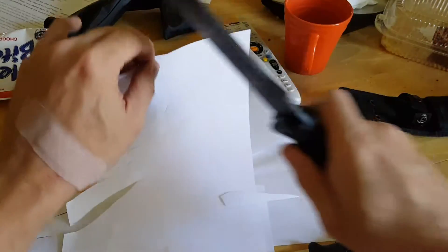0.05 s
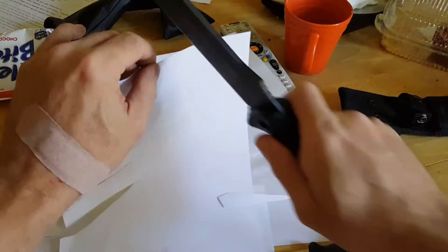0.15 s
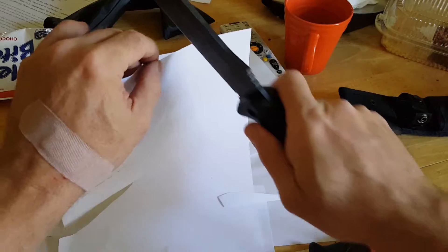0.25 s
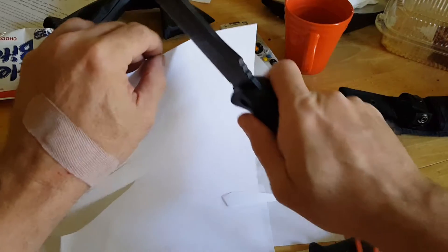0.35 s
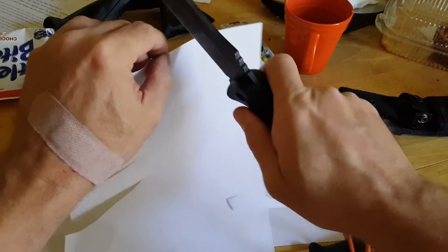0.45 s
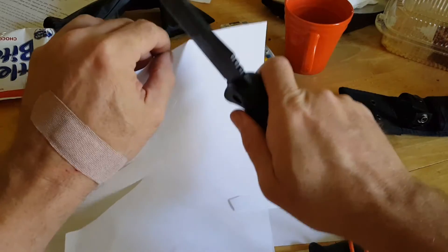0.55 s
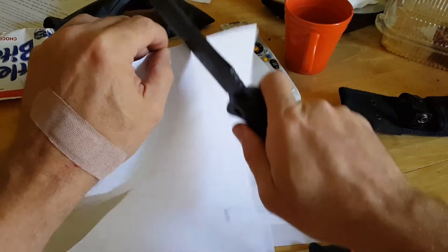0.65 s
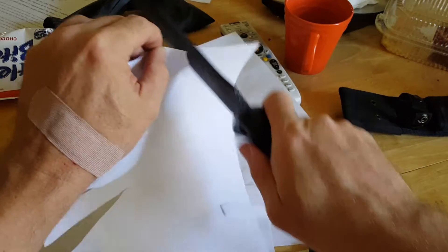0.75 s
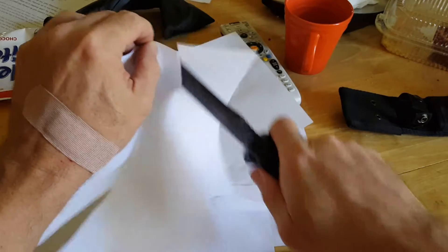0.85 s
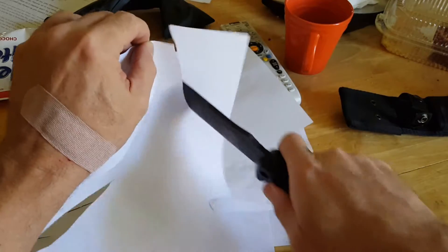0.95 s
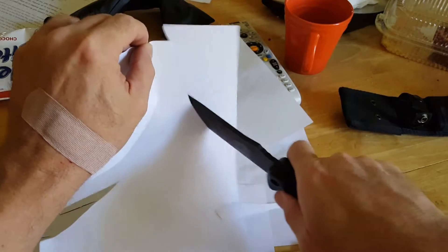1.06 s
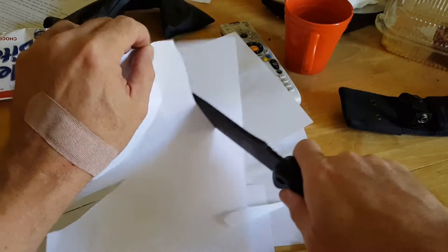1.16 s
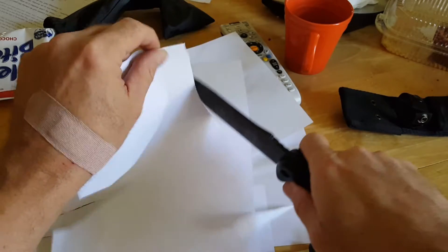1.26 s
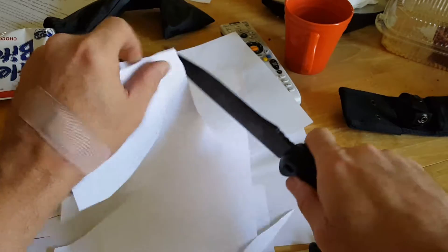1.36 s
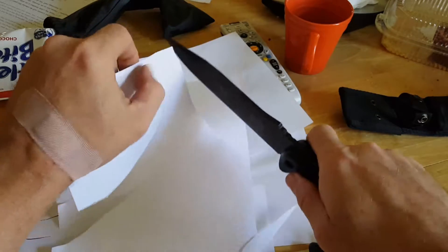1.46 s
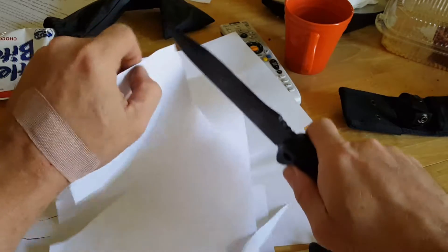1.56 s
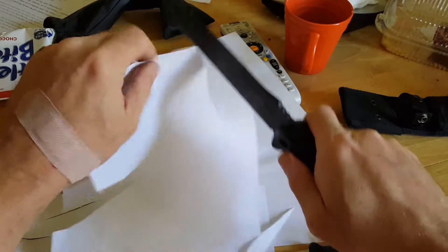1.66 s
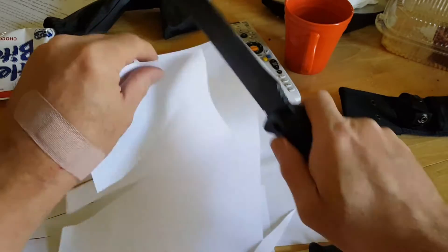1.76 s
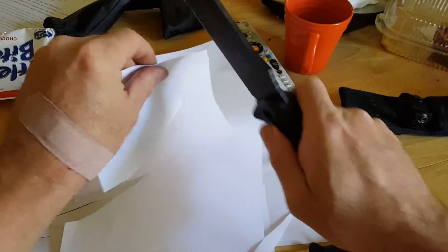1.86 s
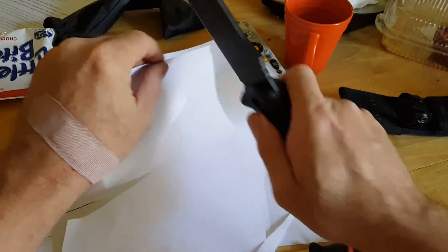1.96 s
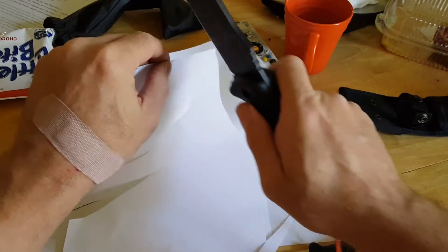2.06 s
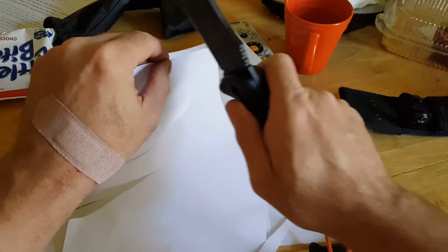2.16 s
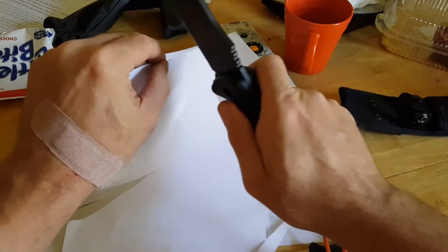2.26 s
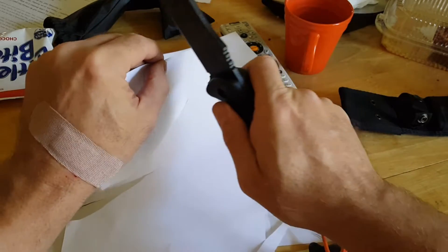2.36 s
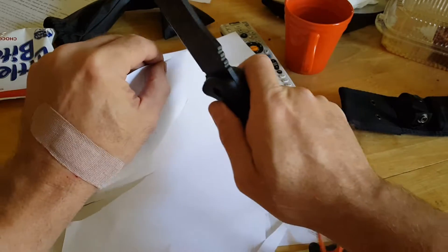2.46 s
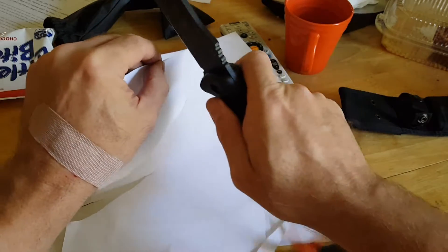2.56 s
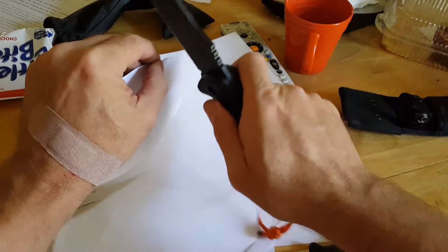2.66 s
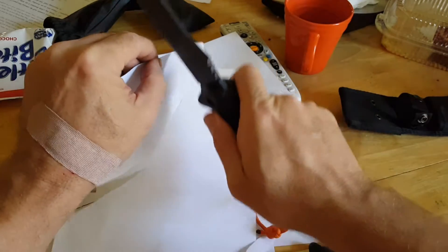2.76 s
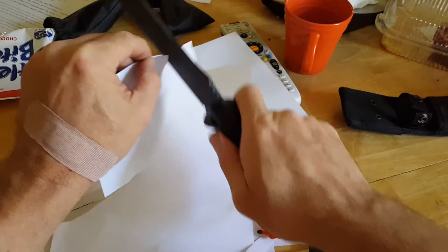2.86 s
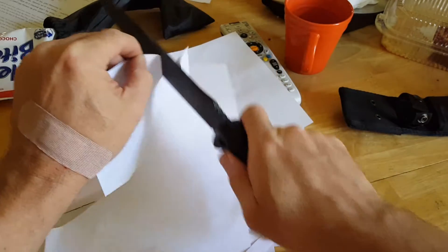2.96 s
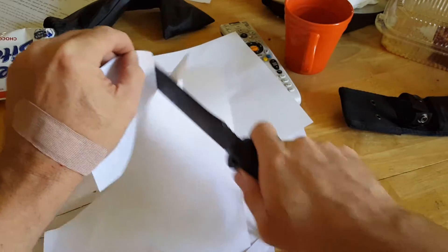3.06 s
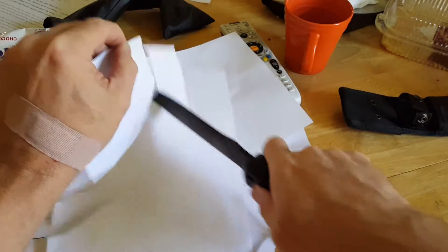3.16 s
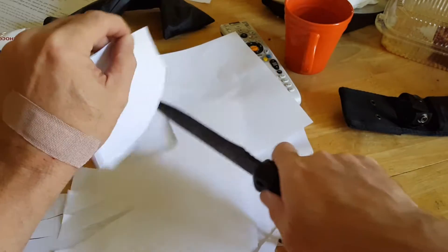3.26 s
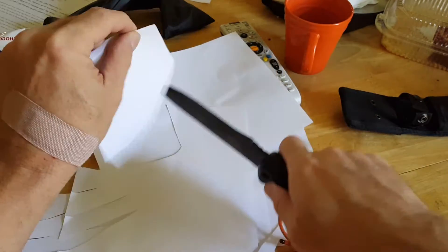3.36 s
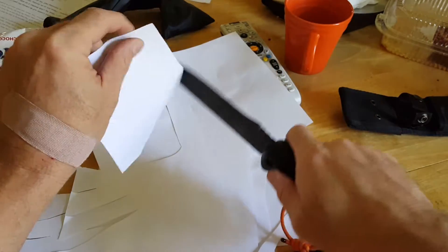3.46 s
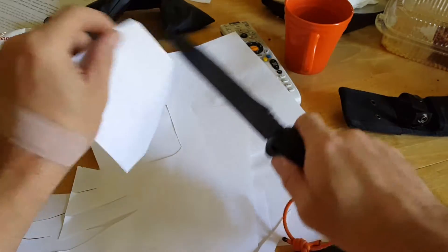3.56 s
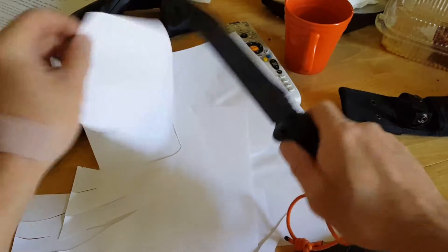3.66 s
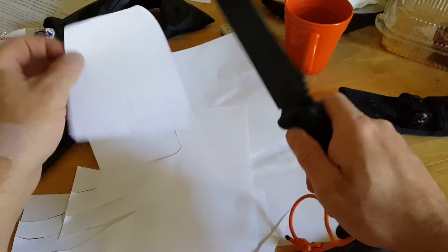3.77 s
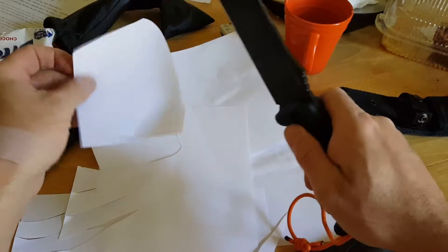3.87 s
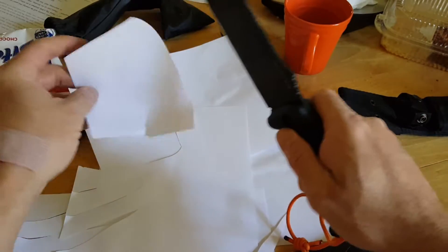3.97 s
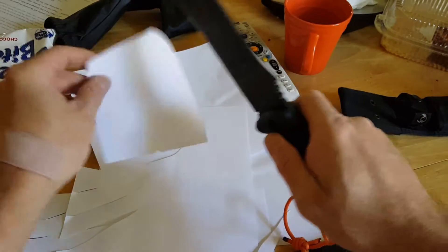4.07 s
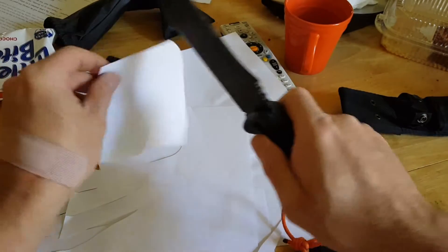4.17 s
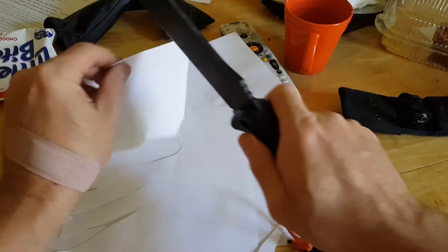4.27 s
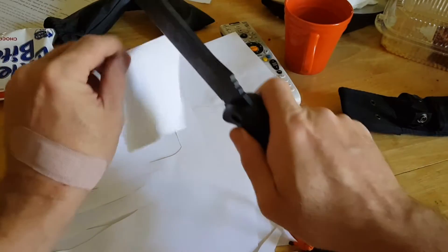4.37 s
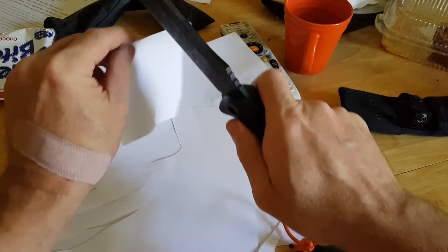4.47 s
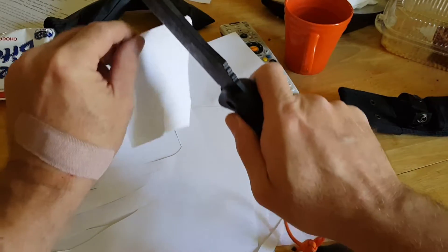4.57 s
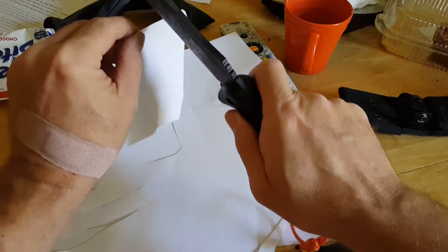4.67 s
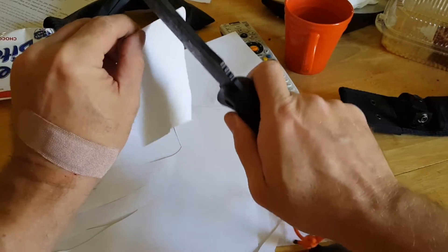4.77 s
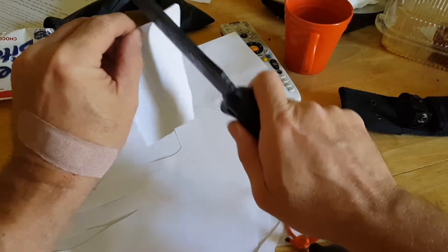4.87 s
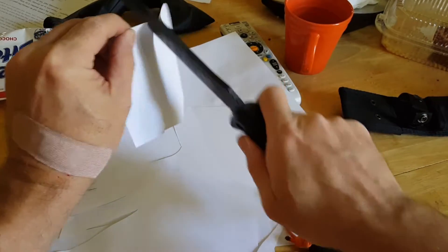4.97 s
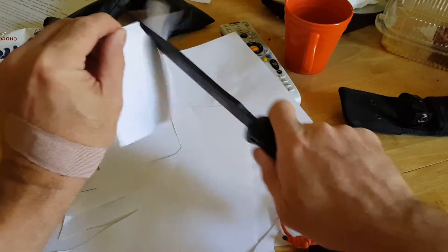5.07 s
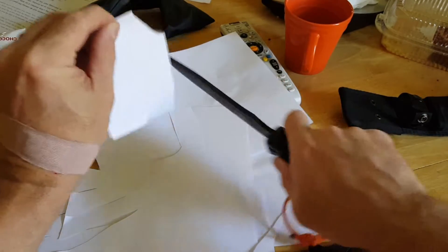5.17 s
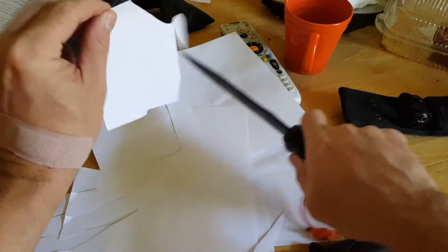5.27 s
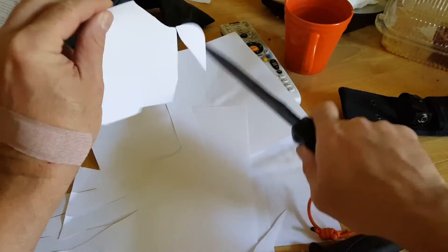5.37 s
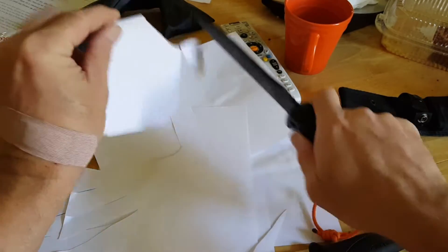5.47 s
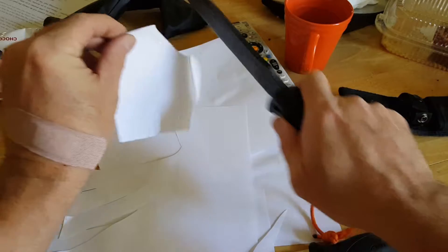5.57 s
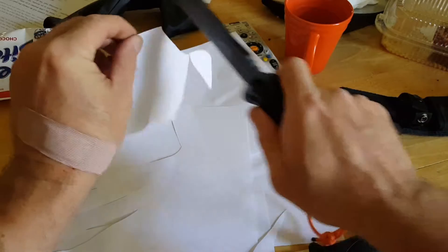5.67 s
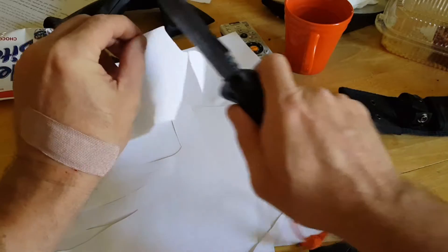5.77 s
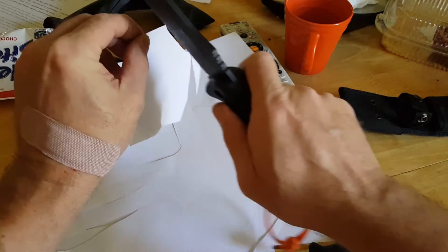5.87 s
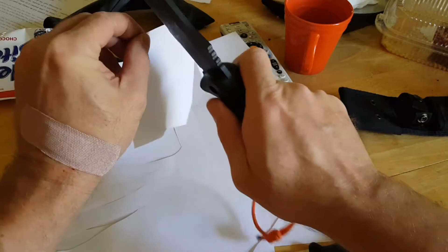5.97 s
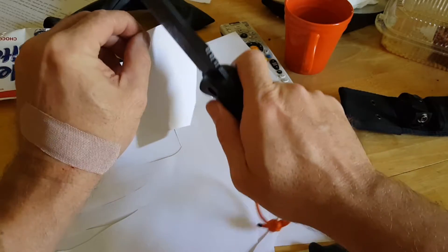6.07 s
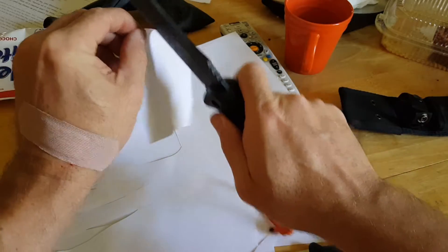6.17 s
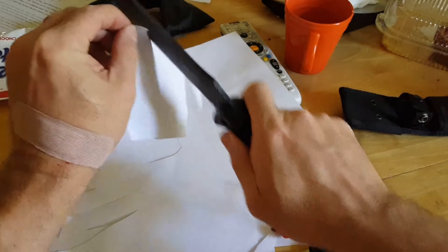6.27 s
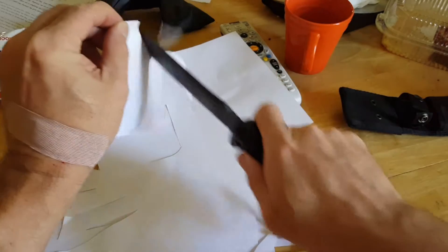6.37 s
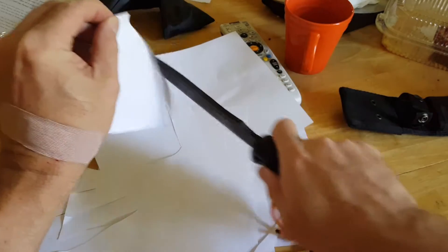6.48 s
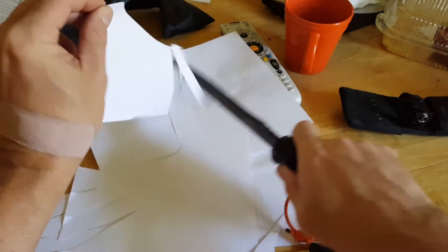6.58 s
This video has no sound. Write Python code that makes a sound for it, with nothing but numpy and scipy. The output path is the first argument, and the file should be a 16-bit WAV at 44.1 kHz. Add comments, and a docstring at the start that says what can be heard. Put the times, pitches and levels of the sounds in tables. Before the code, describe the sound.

Close stereo pickup of a knife cutting held paper in a small quiet room. A half-second slice swells to a sharp crack, then paper rustles and flicks. A second cut comes in two pulls, followed by handling crackles, then two short crisp slices with a quiet gap between them. Faint room air and mains hum lie beneath.

```python
"""Paper sliced above a wooden table

A sharp knife slices a hand-held sheet four times, close to a stereo microphone in a small quiet room.
Each cut is a dense run of snapping fibres that hisses at the edge and shakes the sheet and its loose flap.
Between cuts the paper slides as uneven friction noise, and flicks and drops on the pile as plucked
resonances, over still room air and a faint mains hum of wavering sines."""
import sys
import numpy as np
from scipy import signal
from scipy.fft import rfft, irfft, next_fast_len
from scipy.io import wavfile
from scipy.ndimage import uniform_filter1d, map_coordinates

SR = 44100
rng = np.random.default_rng(int(sys.argv[2]) if len(sys.argv) > 2 else 0)


def log_audio(samples):
    """Write samples as a 16-bit WAV file to the path given in sys.argv[1]."""
    # one column per channel
    frames = np.atleast_2d(samples).T
    # limit to full scale, then quantise
    limited = np.clip(frames, -1, 1)
    pcm = np.round(limited * 32767).astype(np.int16)
    wavfile.write(sys.argv[1], SR, pcm)


N = 291693
TIME = np.arange(N) / SR


def amp(db):
    """Decibels to gain."""
    return 10 ** (np.asarray(db) / 20)


def unit(x):
    """Scale to rms 1."""
    return x / np.sqrt(np.mean(x ** 2) + 1e-20)


def along(points, hz):
    """Read (frequency [Hz], value) points on a log frequency axis."""
    f, v = np.transpose(points)
    return np.interp(np.log(hz + 1), np.log(f + 1), v)


def filtered(x, response):
    """x times a complex response of frequency."""
    size = x.shape[-1]
    padded = next_fast_len(size + 4096)
    spectrum = rfft(x, padded) * response(np.fft.rfftfreq(padded, 1 / SR))
    return irfft(spectrum, padded)[..., :size]


def coloured(x, spectrum):
    """x shaped by the given spectrum, at rms 1."""
    return unit(filtered(x, lambda hz: amp(along(spectrum, hz))))


def resonance(f, hz, width, db):
    """Complex response of one damped mode, which peaks at hz."""
    return amp(db) * 1j * f * width / (hz * hz - f * f + 1j * f * width)


def rung(x, modes):
    """x through a bank of resonances of alternating sign, at rms 1."""
    def bank(f):
        return sum((-1) ** k * resonance(f, *mode) for k, mode in enumerate(modes))
    return unit(filtered(x, bank))


def wobble(rate, size):
    """A smooth random curve, rate knots a second."""
    knots = rng.standard_normal(int(size * rate / SR) + 4)
    return map_coordinates(knots, [np.arange(size) * rate / SR])


# how alike the two microphone ports hear a source: (frequency [Hz], left-right likeness [0 to 1])
LIKENESS = [(130, 0.91), (350, 0.93), (750, 0.71), (1400, 0.75), (3000, 0.18), (6000, 0.26), (14000, 0.12)]
# how far the source leans to the left port: (frequency [Hz], left minus right [dB])
LEFT_LEAN = [(380, 1), (700, 2), (1300, 2.5), (2400, 2), (4400, -1), (6500, 4.5), (9500, -0.5),
             (15000, 0.5)]


def at_ports(pair, lead_ms=0.12):
    """Two unrelated signals become left and right: a broad source that reaches the left port first."""
    def mid_and_side(hz):
        turn = np.arccos(np.clip(along(LIKENESS, hz), -1, 1)) / 2
        return np.array([np.cos(turn), np.sin(turn)])

    half = np.array([[.5], [-.5]])  # each port takes half of the level and time difference
    lead_s = lead_ms / 1000

    def lean_left(hz):
        return amp(half * along(LEFT_LEAN, hz)) * np.exp(2j * np.pi * hz * lead_s * half)

    mid, side = filtered(pair, mid_and_side)
    return filtered(np.array([mid + side, mid - side]), lean_left)


def snaps(size, per_second, clump_db, clump_rate):
    """Fibres let go at random moments, in clumps where the paper is thicker."""
    clicks = (rng.random((2, size)) < per_second / SR) * rng.standard_normal((2, size))
    clumps = amp(clump_db * wobble(clump_rate, size))
    return unit(at_ports(clicks * clumps))


# still air of the room: (frequency [Hz], relative level [dB per Hz])
AIR = [(30, -13), (60, -15), (85, -4), (150, -4.5), (185, 2), (230, -2.5), (280, -12), (450, -6),
       (650, -12.5), (2000, -17.5), (5000, -25.5), (7500, -32), (10000, -36.5), (16000, -29)]
# steady partials of the mains hum, before they waver: (frequency [Hz], level [dB])
HUM_PARTIALS = [(59.5, -78.5), (119, -68.5), (231.5, -71.5), (334, -76.5)]


def background(air_db=-62.5):
    """Shaped noise for still room air, and sines of wavering level and phase for a faint mains hum."""
    air = coloured(at_ports(rng.standard_normal((2, N))), AIR)
    hum = np.zeros(N)
    for hz, db in HUM_PARTIALS:
        level = amp(db + 2.5 * wobble(9, N))
        phase = 2 * np.pi * hz * TIME + .8 * wobble(7, N)
        hum += level * np.sqrt(2) * np.sin(phase)  # root 2 makes the level an rms
    return amp(air_db) * air + hum


# paper brushing over paper, blade and skin:
# (start [s], length [s], hiss level [dB], stirred sheet over the hiss [dB])
BRUSH_STROKES = [(-0.08, 0.2, -59.5, 0), (0.128, 0.2, -62, 1), (0.382, 0.27, -64, -1.5),
                 (1.13, 0.15, -57.5, 6.5), (1.255, 0.2, -48.5, -4), (1.381, 0.21, -55, 1),
                 (1.54, 0.27, -56.5, -2), (1.741, 0.25, -54.5, -1.5), (1.951, 0.23, -57.5, 1),
                 (2.702, .13, -56, -1), (3.16, 0.14, -41, -5), (3.267, 0.37, -61.5, -5),
                 (3.546, 0.4, -59.5, -4), (3.873, 0.19, -55.5, -5.5), (3.998, 0.051, -44.5, -1),
                 (4.002, 0.23, -54, -2), (4.231, 0.11, -61.5, -17), (4.413, .11, -62.5, -25),
                 (4.55, .15, -60, -3.5), (5.29, 0.44, -63, -24), (6.251, .14, -35, -33)]
BRUSH_PEAK_SHARE, BRUSH_ROUNDNESS = 0.32, 1.28  # where along its length a brush peaks; power of its curve
SETTLE_DB, SETTLE_T60_S = -28, 0.16  # rustle of a sheet settling after a flick


def brushing():
    """Gains of hiss and stirred sheet: each brush speeds up and slows to a stop; each flick settles."""
    hiss, sheet = np.zeros((2, N))
    for start, length, db, stir_db in BRUSH_STROKES:
        stroke = np.interp((TIME - start) / length, [0, BRUSH_PEAK_SHARE, 1], [0, 1, 0])
        speed = np.sin(np.pi / 2 * stroke) ** BRUSH_ROUNDNESS
        hiss += amp(db) * speed
        sheet += amp(db + stir_db) * speed
    t = np.arange(SR // 2) / SR
    settling = np.exp(-np.log(1000) * t / SETTLE_T60_S)
    for start, db, _, crackle_db in PAPER_FLICKS:
        hiss[round(start * SR):][:len(t)] += amp(db + crackle_db + SETTLE_DB) * settling
    return hiss, sheet


# hiss of sliding fibres: (frequency [Hz], relative level [dB per Hz])
SLIDE_HISS = [(700, -28.5), (1500, -3), (2300, -6.5), (4000, 0.5), (7700, -7), (9500, -17), (16000, -12)]
# the sheet they stir: (frequency [Hz], relative level [dB per Hz])
STIRRED_SHEET = [(100, -12), (200, -1.5), (450, -6.5), (620, -3.5), (800, -5.5), (1100, -6.5), (1600, -6.5),
                 (2800, -6), (6000, -66)]


def sliding(hiss, sheet, uneven_db=0.5):
    """Paper drags unevenly over paper, with a few tiny crinkles, while the hands find the next cut."""
    friction = snaps(N, per_second=12000, clump_db=1.3, clump_rate=90)
    friction += .4 * snaps(N, per_second=70, clump_db=1, clump_rate=20)  # crinkles
    drag = amp(uneven_db * wobble(20, N))
    return drag * (hiss * coloured(friction, SLIDE_HISS) + sheet * coloured(friction, STIRRED_SHEET))


# light catches: mean rate; level over the slide and its random spread either way, in dB
TICKS_PER_S, TICK_DB, TICK_SPREAD_DB = 5.8, 7.5, 4.5


def ticks(slide, thud_db=-9, crackle_db=-4):
    """Sliding paper catches lightly at random, harder where it slides louder; rows like PAPER_FLICKS."""
    rows = []
    for when, size in rng.random((int(TICKS_PER_S * N / SR), 2)):
        slide_db = 20 * np.log10(slide[int(when * N)] + 1e-9)
        db = slide_db + TICK_DB + TICK_SPREAD_DB * (2 * size - 1)
        rows.append((when * N / SR, db, thud_db, crackle_db))
    return rows


# bending modes of a loose flap: (multiple of its pitch, width [Hz], relative level [dB])
FLAP_BENDING = [(1, 117, -1.5), (2, 82, 4.5)]


def flap_modes(pitch_hz):
    """Bending modes of a flap of the given pitch, as (frequency [Hz], width [Hz], level [dB])."""
    return [(pitch_hz * multiple, width, db) for multiple, width, db in FLAP_BENDING]


# flicks, catches and landings of paper; the trims add to the balance set in flicks():
# (time [s], overall level [dB], thud trim [dB], crackle trim [dB])
PAPER_FLICKS = [(0.087, -52.5, -22, 4.5), (0.166, -37.5, -8, 6), (0.18, -39, -3, 1), (0.674, -45, 9.5, -15),
                (0.921, -18, -33, -9), (0.938, -12.5, -24, -6), (1.092, -18, -22, -21),
                (1.302, -21, -10.5, -4.5), (1.433, -39, -23, -4), (1.569, -38, -7.5, 5.5),
                (1.666, -35.5, -3.5, -8.5), (1.758, -44.5, -3, 0.5), (2.392, -46, -7, -15.5),
                (2.868, -26.5, -7.5, -13), (3.266, -35.5, -4, -1), (3.45, -47.5, -4, -3),
                (3.493, -44, -2, -4), (3.976, -28.5, -20, 3.5), (4.002, -27.5, -9, 6.5),
                (4.009, -26, -35, 6), (4.109, -35, -15, -14), (4.15, -42, -8, -15), (4.274, -48, -7, -13),
                (5.356, -45, -0.5, -18), (5.539, -51, 0, -3)]
# resonances of a plucked sheet: (frequency [Hz], width [Hz], relative level [dB])
PLUCKED_SHEET = [(798, 177, -6.5), (1117, 200, -1.5), (1403, 610, -12.5)]
# a buckling crease: (frequency [Hz], relative level [dB per Hz])
CREASE_CRACKLE = [(600, -39), (1300, -17), (1800, 5.5), (3000, 3), (4300, 2.5), (5500, -1), (7700, -11.5),
                  (9500, -21.5), (16000, -33)]
FLICK_T60_S = 0.063  # a plucked sheet dies away


def flicks(rows, pluck_db=-6, thud_db=-7, crackle_db=-6, thud_hz=210):
    """A sheet buckles or lands: a crack and a short crackle pluck the paper, with a soft thud."""
    out = np.zeros((2, N + SR))
    t = np.arange(SR // 4) / SR
    crack = 1.6 * amp(-60 * t / .009)  # the crease flips within a few milliseconds
    attack = 1 - np.exp(-t / .0003)
    fade = amp(-60 * t / FLICK_T60_S)
    for start, db, thud_trim, crackle_trim in rows:
        crease = snaps(len(t), per_second=14000, clump_db=.5, clump_rate=500)
        pluck = amp(pluck_db) * rung(crease, PLUCKED_SHEET)
        crackle = amp(crackle_trim + crackle_db) * coloured(crease, CREASE_CRACKLE)
        thud = amp(thud_trim + thud_db) * rung(crease, flap_modes(thud_hz))
        # the slow bending modes last twice as long
        sound = (crack + fade) * (pluck + crackle) + np.sqrt(fade) * thud
        out[:, round(start * SR):][:, :len(t)] += amp(db) * attack * sound
    return out[:, :N]


def flexing(x, depth_db=2.8):
    """The sheet bends as it parts, so its many resonances come and go."""
    z = signal.stft(x, nperseg=512)[2]
    field = rng.standard_normal(z.shape[1:])
    field = uniform_filter1d(field, size=2, axis=0)  # over frequency
    field = uniform_filter1d(field, size=16, axis=1)  # over time
    return signal.istft(z * amp(depth_db * unit(field)), nperseg=512)[1][:, :x.shape[-1]]


# one row per pull of the blade, the second cut in two pulls; levels before the balance in slicing():
# (blade bites [s], blade leaves [s], release time constant [s], sheet over rim [dB],
#  its growth as the paper slackens [dB], hiss [dB], flap [dB], flap pitch [Hz])
PULLS = [(0.673, 1.166, 0.0031, -1, -9, -10.5, -14.5, 241), (2.867, 3.059, 0.023, -7, -6.5, -6, -19, 220),
         (3.058, 3.188, 0.0036, -4, -1.5, -2.5, -23, 252), (4.911, 5.179, 0.022, -9, 12, -6.5, -17, 214),
         (6.21, 6.521, 0.031, -2.5, 4, -3.5, -14, 320)]
# how hard the blade works, one curve per pull: (time [s], effort [dB])
BLADE_EFFORT = [
    [(0.68, -36.5), (0.73, -30), (0.802, -34), (0.81, -30), (0.916, -29.5), (0.922, -26.5), (1.078, -26.5),
     (1.09, -24.5), (1.16, -31)],
    [(2.88, -36), (2.944, -35), (3.04, -34.5), (3.06, -31.5)],
    [(3.04, -29), (3.084, -30), (3.164, -26.5), (3.185, -34.5)],
    [(4.92, -36), (4.986, -32), (5.06, -32), (5.126, -36), (5.185, -33.5)],
    [(6.22, -46), (6.246, -39), (6.27, -48), (6.37, -43), (6.45, -30.5), (6.512, -32), (6.53, -34)],
]
# the sheet as it is held for each pull: (frequency [Hz], relative level [dB per Hz])
HELD_1 = [(320, -58), (550, -9.5), (650, -13.5), (704, -6), (983, 1), (1330, -3.5), (1530, -11),
          (1700, -4.5), (2000, -5.5), (2470, -10.5), (3810, -13), (4500, -25), (5850, -51), (9900, -120)]
HELD_2 = [(320, -62), (550, -8.5), (644, -17), (722, -4), (1070, 0), (1290, -4), (2520, -1.5), (3190, -3),
          (3610, 1.5), (4500, -16), (5850, -34), (9900, -120)]
HELD_3 = [(320, -70.5), (550, -16.5), (633, -25), (861, -6.5), (1060, -4), (1200, -5), (1500, -10.5),
          (1880, -1.5), (2500, -10.5), (3000, -6.5), (4500, -23), (5850, -44), (9900, -120)]
HELD_4 = [(320, -40), (550, -19.5), (782, -11), (974, -4), (1240, -8), (1410, -8), (1550, -14.5),
          (1880, -3.5), (2060, -12.5), (2410, -9.5), (2900, -11), (4500, -21.5), (5850, -59.5),
          (9900, -120)]
HELD_5 = [(320, -29.5), (550, -24.5), (824, -4), (900, -9), (983, -4), (1510, -7.5), (1950, -4),
          (2170, -8.5), (2500, -3.5), (2870, -4.5), (4500, -16), (5850, -58), (9900, -120)]
# snapping fibres at the edge: (frequency [Hz], relative level [dB per Hz])
EDGE_HISS = [(2600, -28), (3900, -12), (5200, -1), (6500, -1.5), (7700, -5), (8500, -9), (9700, -17),
             (11500, -13), (14500, -12), (16000, -15)]
BITE_S = 0.0073  # time constant of the edge sinking into the paper
HISS_FOLLOWS, HISS_GROWS_DB = 0.22, 4  # share of effort changes the hiss follows; its growth along a pull
BREAK_S, BREAK_FLAP_DB, BREAK_HISS_DB = 0.083, 13, 0.5  # swell as the blade breaks out of the sheet


def slicing(split_hz=1500, rim_db=2.5, hiss_db=3.0):
    """One run of snapping fibres per pull drives the sheet, its taut rim, the hiss and the flap."""
    out = np.zeros((2, N))
    for pull, effort, grip in zip(PULLS, BLADE_EFFORT, [HELD_1, HELD_2, HELD_3, HELD_4, HELD_5]):
        start, end, release, weight_db, slack_db, edge_db, flap_db, flap_hz = pull
        span = (TIME >= start) & (TIME < end + .1)
        t = TIME[span]
        force = np.interp(t, *np.transpose(effort))
        progress = np.interp(t, [start, end], [-.5, .5])
        breaking = np.exp(-np.abs(t - end) / BREAK_S)

        # slackening shifts the balance between the rim and the broad sheet with its flap
        lean = weight_db + slack_db * progress
        rim = force - 10 * np.log10(1 + amp(lean) ** 2)
        sheet = rim + lean
        flap = sheet + flap_db + BREAK_FLAP_DB * breaking
        hiss = force.mean() + HISS_FOLLOWS * (force - force.mean())
        hiss += edge_db + HISS_GROWS_DB * progress + BREAK_HISS_DB * breaking

        fibres = snaps(len(t), per_second=20000, clump_db=1.1, clump_rate=160)
        body = coloured(flexing(fibres), grip)
        # the broad sheet carries the low resonances, the stiff paper beside the blade the high ones
        broad = filtered(body, lambda hz: 1 / (1 + (hz / split_hz) ** 8))
        sound = amp(sheet) * unit(broad) + amp(rim + rim_db) * unit(body - broad)
        sound += amp(hiss + hiss_db) * coloured(flexing(fibres), EDGE_HISS)
        sound += amp(flap) * rung(fibres, flap_modes(flap_hz))
        contact = (1 - np.exp(-(t - start) / BITE_S)) * np.exp(-np.maximum(t - end, 0) / release)
        out[:, span] += contact * sound
    return out


# how long the small room rings: (frequency [Hz], time to fall 60 dB [s])
ROOM_DECAY = [(200, 0.28), (1500, 0.33), (6000, 0.37), (14000, 0.031)]


def room(x):
    """The walls answer with a tail of decaying noise whose highest treble dies first."""
    noise = at_ports(rng.standard_normal((2, SR // 2)))
    hz, t, z = signal.stft(noise, SR, nperseg=256)
    decay = amp(-60 * t / along(ROOM_DECAY, hz)[:, None])
    tail = signal.istft(z * decay, SR, nperseg=256)[1]
    tail = np.pad(tail / np.linalg.norm(tail[0]), ((0, 0), (200, 0)))  # 200 samples before the answer
    return signal.fftconvolve(x.mean(axis=0)[None], tail, axes=1)[:, :N]


# the bounce off the table cancels a narrow band: (frequency [Hz], width [Hz], bounce level [dB])
TABLE_BOUNCE = (610, 113, -7)


def scene(room_db=-9):
    """Close paper sounds above a table in a quiet room."""
    hiss, sheet = brushing()
    paper = sliding(hiss, sheet) + flicks(PAPER_FLICKS + ticks(hiss)) + slicing()
    paper = filtered(paper, lambda hz: 1 - resonance(hz, *TABLE_BOUNCE))
    return paper + amp(room_db) * room(paper) + background()


# the left microphone port rings: (frequency [Hz], width [Hz], level [dB])
LEFT_PORT = (7670, 690, 0)
TOP_HZ = 15950  # band limit


def record(dry):
    """The left microphone port adds a narrow ring, and a steep filter removes all above the band limit."""
    left = filtered(dry[0], lambda hz: 1 + resonance(hz, *LEFT_PORT))
    return filtered(np.array([left, dry[1]]), lambda hz: 1 / (1 + (hz / TOP_HZ) ** 200))


dry = scene()
out = record(dry)
log_audio(out)
```